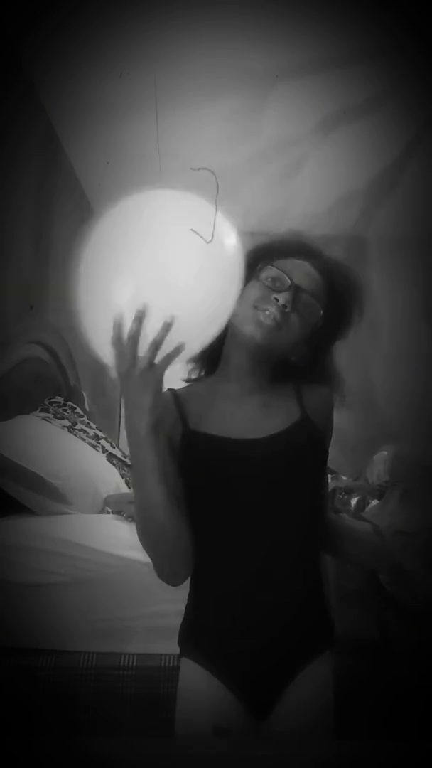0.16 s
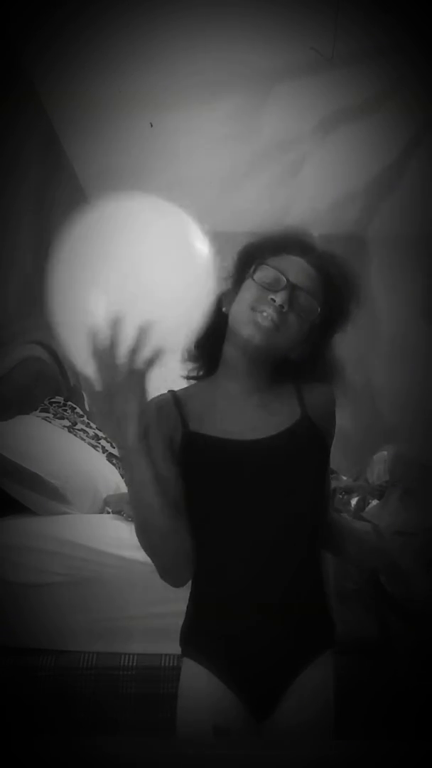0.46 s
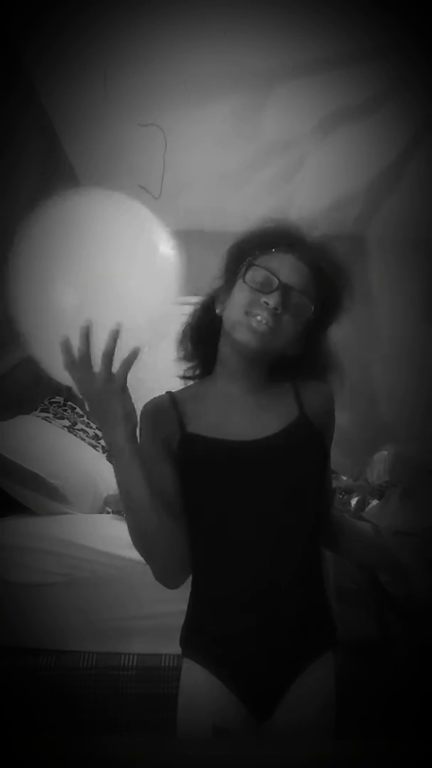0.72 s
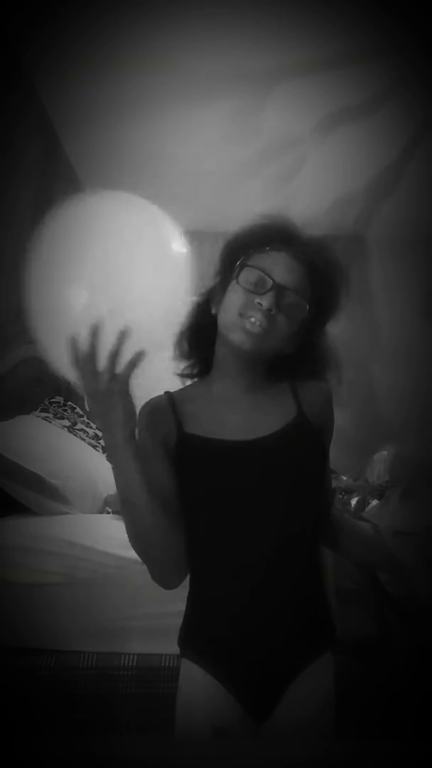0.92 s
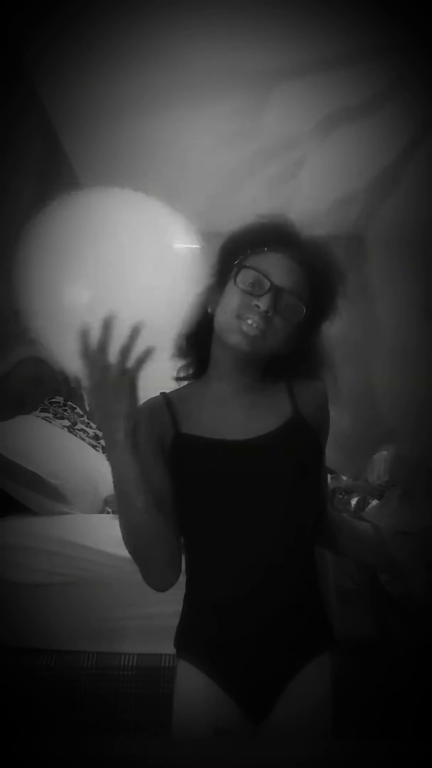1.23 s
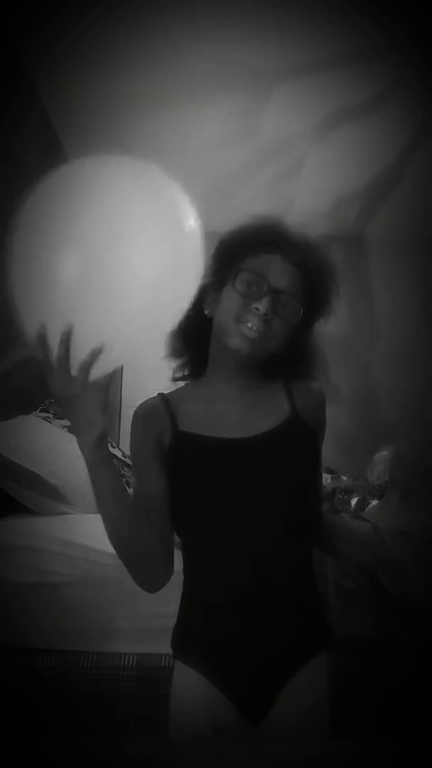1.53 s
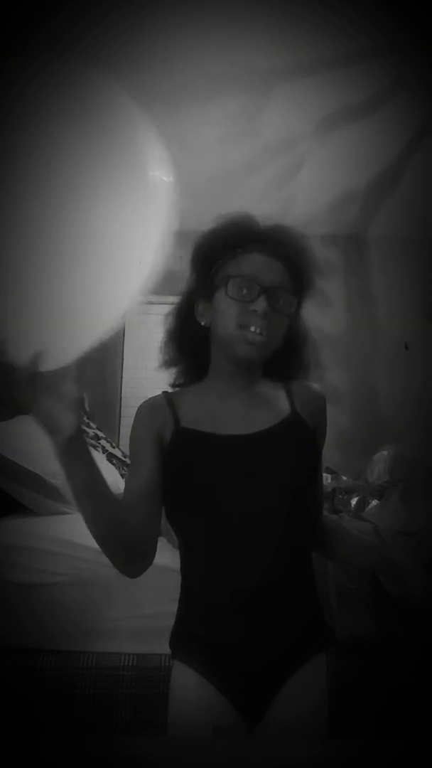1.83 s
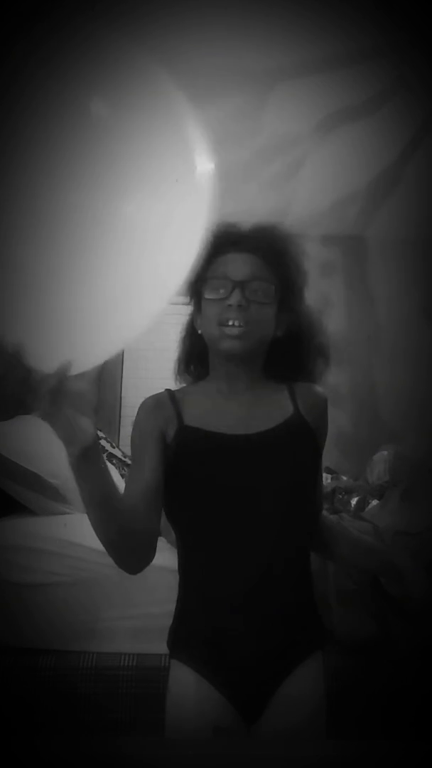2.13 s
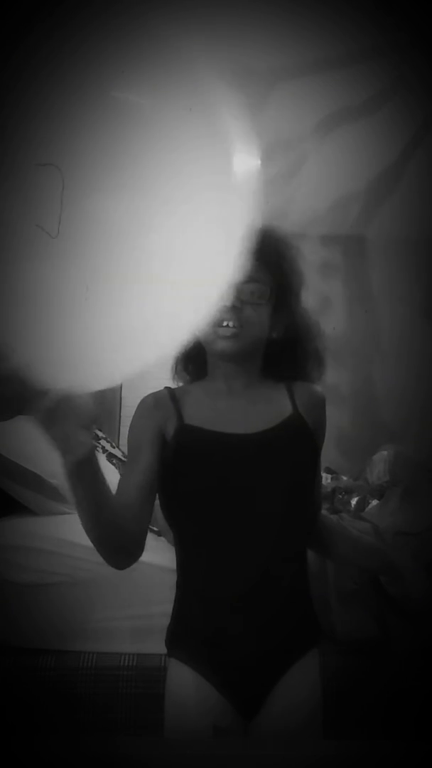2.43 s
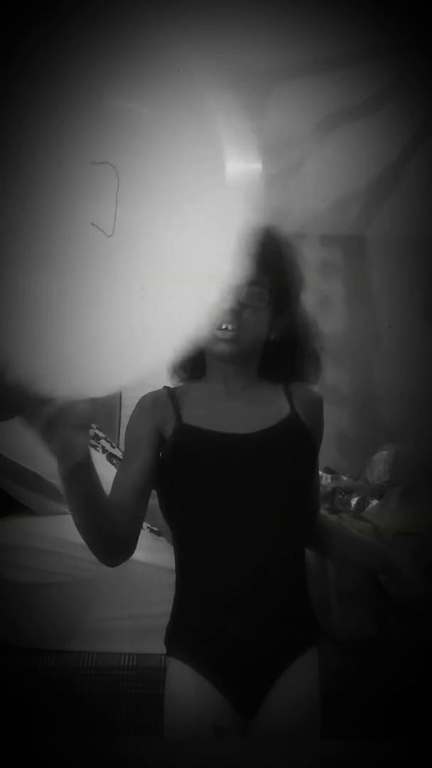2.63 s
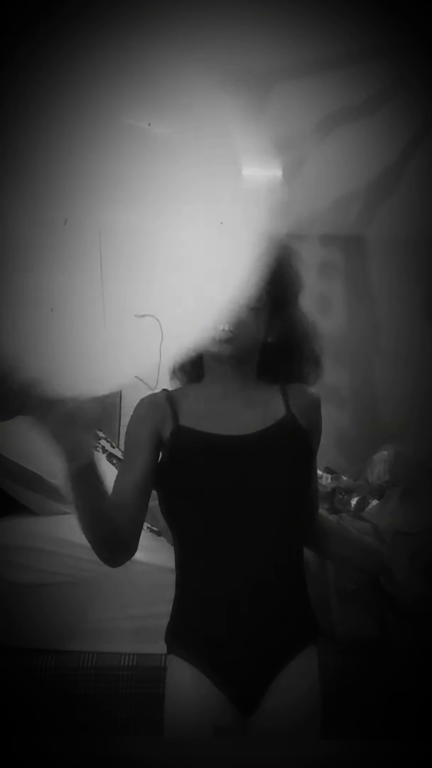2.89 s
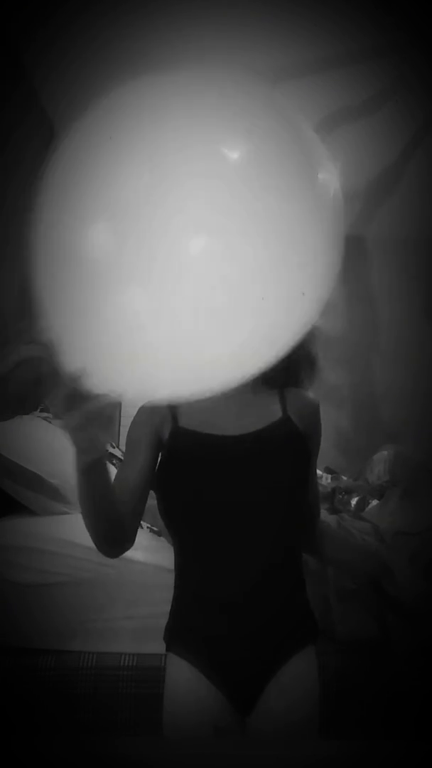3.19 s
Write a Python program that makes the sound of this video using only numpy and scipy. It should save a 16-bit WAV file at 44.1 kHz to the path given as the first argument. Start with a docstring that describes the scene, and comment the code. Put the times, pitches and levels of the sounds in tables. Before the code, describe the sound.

Hollow balloon knocks several times a second, soft at first, joined by crisp toy cracks and short pings; halfway it moves close to the microphone, with heavier thumps, rubber scuffs and one tiny squeak, in a quiet bedroom.

```python
"""Balloon with a rattling toy

An inflated latex balloon is jiggled and batted on the fingertips in a small room, a little toy inside.
Knocks sound the air as decaying sines and the skin as damped noise; shoves add a slow wobble.
Hard contacts crack, ring and ping the skin; rubbing is grainy noise with one thin rising squeak.
The room hums on at its low resonances, whose balance changes as the balloon comes closer halfway through.
"""
import sys
import numpy as np
from scipy.fft import rfft, irfft, next_fast_len
from scipy.io import wavfile
from scipy.ndimage import map_coordinates

SR = 44100
rng = np.random.default_rng(int(sys.argv[2]) if len(sys.argv) > 2 else 0)


def transcribe(signal):
    """Save signal, clipped to [-1, 1], as a 16-bit WAV file at the path in sys.argv[1]."""
    frames = np.atleast_2d(signal).T
    limited = np.clip(frames, -1, 1)
    pcm = np.round(limited * 32767).astype(np.int16)
    wavfile.write(sys.argv[1], SR, pcm)


N = 147735
T = np.arange(SR // 2) / SR  # time within one event [s]
CLOCK = np.arange(N) / SR  # time within the scene [s]
TILT_PIVOT_HZ = 2000  # spectral tilts leave this frequency unchanged


def amp(db):
    """Decibel law: level to amplitude ratio."""
    return 10 ** (np.asarray(db) / 20)


def unit(x):
    """Power normalization: scale to rms 1."""
    return x / np.sqrt(np.mean(x ** 2) + 1e-20)


def along(points, hz):
    """Logarithmic frequency scale: interpolate (frequency [Hz], value) points."""
    f, v = np.transpose(points)
    return np.interp(np.log(hz + 1), np.log(f + 1), v)


def fade(t60, rise):
    """Exponential damping: a quick rise, then a decay losing 60 dB in t60 seconds."""
    return 1000 ** (-T / t60) * (1 - np.exp(-T / rise))


def add(out, s, x):
    """Linear superposition: mix x into out at time s."""
    i = max(round(s * SR), 0)
    out[:, i:i + x.shape[-1]] += x[..., :max(N - i, 0)]


def shaped(x, envelope):
    """Energy conservation: noise under an envelope, with just the envelope's energy."""
    return unit(x * envelope) * np.sqrt(np.mean(envelope ** 2))


def wander(rate, t):
    """Band-limited randomness: a smooth random curve through `rate` points per second."""
    return map_coordinates(rng.standard_normal(200), [t * rate])


def nearness(s):
    """Source distance: 0 while the balloon is held back, 1 once it has come close."""
    closer_s, approach_s = 1.74, 0.34  # middle and duration of the approach
    return np.clip((s - closer_s) / approach_s + .5, 0, 1)


# left-right likeness of the room sound: (frequency [Hz], correlation [-1 to 1])
LIKENESS = [(60, 1), (130, 1), (300, 0.99), (600, 0.75), (1200, 0.24), (3000, 0.18), (12000, 0.036)]


def noise(spectrum, alike, size, colour_db=0):
    """Interaural coherence: coloured stereo noise of rms 1 with a set left-right correlation."""
    hz = np.fft.rfftfreq(size, 1 / SR)
    # cos^2 - sin^2 of this angle is the wanted correlation
    turn = np.arccos(np.clip(along(alike, hz), -1, 1)) / 2
    gain = amp(along(spectrum, hz) + colour_db)
    spread = gain * [np.cos(turn), np.sin(turn)]
    mid, side = irfft(rfft(rng.standard_normal((2, size))) * spread, size)
    return unit(np.array([mid + side, mid - side]))


# quiet room floor, spectrum shape: (frequency [Hz], relative level [dB])
FLOOR_SPECTRUM = [(25, 0), (50, -6), (120, 3), (300, -0.5), (1000, -17), (4000, -33), (16000, -42)]
FLOOR_DB = -48


def room_floor():
    """Stationary noise: the quiet, mostly low background of the room."""
    return amp(FLOOR_DB) * noise(FLOOR_SPECTRUM, LIKENESS, N)


def grain(rate, depth_db, size):
    """Stick-slip friction: a gain of rms 1 that jumps about at `rate` points per second."""
    at = np.arange(size) * rate / SR
    steps = map_coordinates(rng.standard_normal(size), [at], order=1)
    return unit(amp(depth_db * np.clip(steps, -2, 2)))


def bright_spot(hz, centre):
    """Resonant emphasis: the lift in dB round the frequency that a contact favours."""
    peak_db, peak_octaves = 7, 0.11
    return peak_db * np.exp(-.5 * (np.log2(hz / centre) / peak_octaves) ** 2)


# fixed set of skin modes: (frequency [Hz])
SKIN_MODES = [620, 915, 1110, 1840, 2750, 3550, 4220, 5050, 5550, 6720, 8800]
MODE_DB, MODE_SCATTER_DB = -1, 1  # mean change of colour at a mode; scatter from blow to blow
MODE_WIDTH = 0.012  # half-width as a share of the frequency
RIPPLE_DB, RIPPLE_SPACING_HZ = 3, 97.9  # random uneven colouring per contact
RIPPLE_FULL_HZ = 630  # the ripple reaches full depth here
DIRECT_ALIKE = 0.1  # least left-right correlation of the direct sound
TAIL_GRAIN_DB = 2.5


def contact_colour(tilt_db, bright_hz):
    """Spectral irregularity: random uneven colouring in dB per contact, plus a fixed set of skin modes."""
    hz = np.fft.rfftfreq(len(T), 1 / SR) + 1
    ripple = map_coordinates(rng.standard_normal(2000), [hz / RIPPLE_SPACING_HZ])
    colour_db = RIPPLE_DB * np.clip(ripple, -2, 1.5) * np.minimum(hz / RIPPLE_FULL_HZ, 1)
    colour_db += tilt_db * np.log2(hz / TILT_PIVOT_HZ)
    for mode_hz in SKIN_MODES:
        height_db = MODE_DB + MODE_SCATTER_DB * rng.standard_normal()
        colour_db += height_db / (1 + ((hz / mode_hz - 1) / MODE_WIDTH) ** 2)
    if bright_hz:
        colour_db += bright_spot(hz, bright_hz)
    return colour_db


def burst(spectrum, t60, rise, room_db, room_t60, room_rise, grain_db, tilt_db=0, bright_hz=None):
    """Direct and reverberant fields: a damped noise burst of the skin with the room's answer."""
    colour_db = contact_colour(tilt_db, bright_hz)
    close = [(f, max(v, DIRECT_ALIKE)) for f, v in LIKENESS]
    rough = noise(spectrum, close, len(T), colour_db) * grain(782, grain_db, len(T))
    direct = shaped(rough, fade(t60, rise))
    tail = noise(spectrum, LIKENESS, len(T), colour_db) * fade(room_t60, room_rise)
    return direct + amp(room_db) * tail * grain(450, TAIL_GRAIN_DB, len(T))


# knocks on the balloon: (time [s], pitch [Hz], relative thump level [dB],
# relative skin level [dB], relative room hum level [dB])
BALLOON_KNOCKS = [(0.0, 268, -41, -27.5, -36.5), (.196, 302, -24.5, -22.5, -31),
                  (.406, 343, -22, -23.5, -39.5), (0.534, 133, -29, -30.5, -37),
                  (.645, 334, -30.5, -24, -29.5), (0.731, 188, -26, -24.5, -36),
                  (.751, 238, -30, -23.5, -27.5), (.859, 257, -18.5, -17.5, -24.5),
                  (.955, 259, -18.5, -20, -21.5), (1.056, 245, -45, -17, -28.5),
                  (1.165, 245, -26.5, -29, -51), (1.192, 180, -17, -20, -21.5),
                  (1.295, 358.5, -25, -26.5, -34), (1.329, 245, -28, -26.5, -41),
                  (1.415, 248, -25, -27, -30), (1.572, 254, -27, -29, -30), (1.671, 153, -16.5, -19, -20.5),
                  (1.741, 239.5, -21.5, -24, -36), (1.765, 184, -18.5, -18.5, -23),
                  (1.849, 171, -17.5, -17, -15), (1.932, 214, -9.5, -18, -17.5),
                  (1.968, 208.5, -14.5, -18, -29), (2.004, 243, -16.5, -42, -23.5),
                  (2.045, 111, -32, -19, -14.5), (2.14, 181, -20, -16, -20.5),
                  (2.157, 245, -12, -23, -19.5), (2.259, 155, -21.5, -25, -16.5),
                  (2.314, 222.4, -11, -18, -28), (2.405, 335, -42, -25.5, -40),
                  (2.627, 172, -25, -27.5, -57), (2.708, 198, -16.5, -23, -24),
                  (2.881, 172.5, -21.5, -27, -28.5), (2.937, 231, -10, -24.5, -22.5),
                  (2.968, 214, -14, -27.5, -22), (3.03, 108, -23.5, -22.5, -13),
                  (3.151, 236, -17, -19.5, -16.5), (3.229, 190, -8, -17.5, -15.5),
                  (3.286, 158.6, -14, -23.5, -35), (3.331, 130, -19, -27.5, -37)]
# modes of the air and skin: (multiple of the pitch [1], relative level [dB], t60 [s])
AIR_MODES = [(0.622, -9.5, 0.19), (1, 1, 0.11), (1.421, -26, 0.048)]
# skin of a knock, spectrum shape: (frequency [Hz], relative level [dB])
SKIN_SPECTRUM = [(30, -38), (70, -0.5), (130, 3.5), (300, 4.5), (450, -2.5), (600, -7.5), (1000, -14),
                 (1600, -20.5), (4000, -28), (16000, -47)]
THUMP_RISE_S = 0.0045


def knocks():
    """Modal excitation: each knock rings the balloon's low modes and shakes its skin."""
    out = np.zeros((2, N))
    for s, hz, thump_db, skin_db, _ in BALLOON_KNOCKS:
        thump = 0
        for multiple, db, t60 in AIR_MODES:
            thump = thump + amp(db) * np.sin(2 * np.pi * hz * multiple * T) * fade(t60, THUMP_RISE_S)
        add(out, s, -amp(thump_db + 9.0) * thump)
        skin = burst(SKIN_SPECTRUM, t60=0.083, rise=0.0022, room_db=-4.5, room_t60=0.32,
                     room_rise=0.0035, grain_db=-3)
        add(out, s, amp(skin_db + 6) * skin)
    return out


# shoves that set the whole balloon wobbling: (time [s], level [dB])
BALLOON_SHOVES = [(0.0, -30.5), (.2, -29.5), (.41, -26.5), (.7, -27.5), (1.05, -24), (1.3, -33),
                  (1.67, -46), (2.26, -31), (3.23, -41)]
WOBBLE_HZ, WOBBLE_T60_S, WOBBLE_RISE_S = 50.8, 0.8, 0.0046


def wobble():
    """Damped free oscillation: the balloon's slowest mode swings on after each shove."""
    power = np.zeros((1, N))
    for s, db in BALLOON_SHOVES:
        add(power, s, (amp(db) * fade(WOBBLE_T60_S, WOBBLE_RISE_S)) ** 2)
    phase = 2 * np.pi * WOBBLE_HZ * CLOCK + .4 * wander(8, CLOCK)
    return np.sqrt(power) * np.sin(phase)


# room resonances: (frequency [Hz], t60 [s], relative level with the balloon far [dB],
# relative level with it near [dB])
ROOM_RESONANCES = [(108, 0.34, -9, 0), (127.7, 0.44, 0, -10.5), (169.6, 0.25, -4.5, -7.5),
                   (246.7, 0.5, -6.5, -8), (350, 0.57, -10.5, -28), (504.4, 0.16, -8.5, -19),
                   (573, 0.26, -13.5, -24)]
HUM_RISE_S = 0.0051


def room_hum():
    """Room modes: knocks feed low resonances, balanced by where the balloon is."""
    out = np.zeros(N)
    near = nearness(CLOCK)
    for hz, t60, far_db, near_db in ROOM_RESONANCES:
        power = np.zeros((1, N))
        for s, _, _, _, hum_db in BALLOON_KNOCKS:
            add(power, s, (amp(hum_db) * fade(t60, HUM_RISE_S)) ** 2)
        gain = amp(5.5 + far_db + near * (near_db - far_db))
        phase = 2 * np.pi * hz * CLOCK + .5 * wander(14, CLOCK)
        out += np.sqrt(power[0]) * gain * np.sin(phase)
    return out


# scuffs of the rubber: (middle [s], standard deviation of the swell [s], relative level [dB])
RUBBER_SCUFFS = [(.01, 0.064, -45.5), (0.065, 0.01, -39), (0.218, 0.064, -42.5), (0.437, 0.024, -33),
                 (0.544, 0.019, -39), (0.662, 0.027, -39.5), (1.401, 0.0087, -39.5), (2.032, 0.024, -23.5),
                 (3.245, 0.026, -28.5)]
# rubbing, spectrum shape: (frequency [Hz], relative level [dB])
SCUFF_SPECTRUM = [(100, -28), (400, 13.5), (900, 6.5), (1500, -2.5), (2600, 3), (4000, -9.5), (8000, -10),
                  (10500, -21.5), (15000, -19), (16500, -38)]


def scuffs():
    """Friction noise: grainy swells of rubbing."""
    swell = sum(amp(db) * np.exp(-.5 * ((CLOCK - s) / length) ** 2) for s, length, db in RUBBER_SCUFFS)
    return swell * noise(SCUFF_SPECTRUM, LIKENESS, N) * grain(rate=430, depth_db=3.0, size=N)


# crack of a contact, spectrum shape: (frequency [Hz], relative level [dB])
CLICK_SPECTRUM = [(150, -26), (500, -6), (1000, 6), (1500, -3), (2000, 3), (4000, -1), (6000, -3),
                  (8700, -7), (10300, -20), (12500, -15.5), (15000, -25), (16500, -64)]
CLICK_T60_S, CLICK_RISE_S = 0.019, 0.00036  # for a contact at CLICK_DB
CLICK_DB, LONGER_PER_DB = -15.5, 0.1473  # harder contacts last longer, by this exponent per dB
RING_T60_S, RING_DETUNE = .17, .008  # random spread of each ring's pitch, as a share of it


def skin_ring(centre, tilt_db):
    """Modal superposition: the skin's modes sing on, in a new mix for each contact."""
    hz = np.array(SKIN_MODES) * (1 + RING_DETUNE * rng.standard_normal())
    level_db = along(CLICK_SPECTRUM, hz) + tilt_db * np.log2(hz / TILT_PIVOT_HZ)
    level_db += 2 * bright_spot(hz, centre) + MODE_SCATTER_DB * rng.standard_normal(len(hz))
    gain = amp(level_db) * np.sqrt(hz)
    waves = np.sin(2 * np.pi * (hz[:, None] * T + rng.random((2, len(hz), 1))))
    return gain / np.linalg.norm(gain) @ waves * fade(RING_T60_S, CLICK_RISE_S)


# the toy strikes the taut rubber: (time [s], relative level [dB], brightest frequency [Hz],
# tilt [dB per octave])
TOY_CLICKS = [(.406, -21, 400, -7), (0.6298, -28, 1980, -6), (0.7325, -15.5, 1860, 1),
              (.735, -14, 5300, -1.5), (0.8575, -22, 2570, -3.5), (0.863, -23.5, 4000, 6),
              (.868, -17.5, 3000, 0), (0.9545, -17, 3800, -1.5), (0.96, -25, 6500, -6.5),
              (1.0525, -19.5, 3900, -6), (1.059, -13.5, 4100, 0), (1.196, -21.5, 3640, 3),
              (1.301, -25, 2830, 2), (1.329, -22, 3940, -4), (1.4962, -25, 3120, -4.5),
              (1.6698, -28, 1500, 3), (1.6772, -25.5, 1030, 1), (1.7428, -28.5, 4470, 4),
              (1.766, -16.5, 1620, -2.5), (1.849, -18, 2350, -3.5), (1.932, -17, 1110, -3.5),
              (1.938, -18, 2270, 6), (1.9663, -13.5, 1060, -0.5), (2.0036, -16.5, 3000, 2),
              (2.007, -15, 3200, 0), (2.015, -29, 3200, 1), (2.044, -16, 1550, -3), (2.141, -21, 645, -4),
              (2.156, -16.5, 1110, -4.5), (2.2603, -25, 2450, 5), (2.314, -18, 960, 0),
              (2.32, -19, 1330, 2), (2.4069, -29, 1010, -3), (2.4916, -28.5, 2480, -2.5),
              (2.627, -27, 1170, -11), (2.638, -18, 1140, -4.5), (2.7076, -17.5, 1080, -5),
              (2.8904, -20.5, 2700, 3.2), (2.9363, -16.5, 2780, 3.5), (2.9721, -17, 950, -5.5),
              (3.028, -17, 1620, -5), (3.038, -15, 2780, -1), (3.153, -13.5, 1620, 5),
              (3.153, -14, 3730, 5.5), (3.2311, -17, 3000, 0.5), (3.236, -12, 1080, -7.5),
              (3.2861, -15.5, 2330, -3)]
SNAP_DB, SNAP_T60_S = -3.5, 0.0034  # the first instant of a contact
RING_DB, NEAR_DRIER_DB, PAN_SCATTER_DB = -14, 3, 4.5


def clicks():
    """Impact excitation: the toy cracks on taut rubber; longer contacts feed ring and room more."""
    out = np.zeros((2, N))
    octaves = np.log2((np.fft.rfftfreq(len(T), 1 / SR) + 1) / TILT_PIVOT_HZ)
    for s, db, hz, tilt_db in TOY_CLICKS:
        longer = np.exp(LONGER_PER_DB * (db - CLICK_DB))
        fed_db = 10 * np.log10(longer) - NEAR_DRIER_DB * nearness(s)
        crack = burst(CLICK_SPECTRUM, t60=CLICK_T60_S * longer, rise=CLICK_RISE_S * longer,
                      room_db=fed_db - 10, room_t60=0.25, room_rise=0.001,
                      grain_db=-2.0, tilt_db=tilt_db, bright_hz=hz)
        # the snap is tilted 2 dB per octave further toward the treble
        snap = noise(CLICK_SPECTRUM, LIKENESS, len(T), (tilt_db + 2) * octaves)
        snap = shaped(snap, 1000 ** (-T / SNAP_T60_S))
        ring = skin_ring(hz, tilt_db)
        contact = crack + amp(SNAP_DB) * snap + amp(RING_DB + fed_db) * ring
        pan = amp(PAN_SCATTER_DB * rng.standard_normal() * np.array([[.5], [-.5]]))
        add(out, s, amp(db) * contact * pan)
    return out


# short hollow pings of the skin, many sounding together with a click:
# (time [s], settled pitch [Hz], level [dB])
SKIN_PINGS = [(.637, 480, -24), (.733, 1855, -17.5), (1.06, 4070, -16), (1.967, 1042, -15.5),
              (2.002, 2950, -19), (2.636, 1122, -22), (3.155, 4000, -12.5), (3.234, 608, -18),
              (3.236, 1090, -15.5), (3.287, 2180, -22)]
PING_CYCLES, PING_RISE_S = 38, .0015  # t60 in cycles of the settled pitch; attack
PING_SAG = .1  # share by which the pitch starts high


def pings():
    """Damped oscillation: a short hollow ping of the skin, its pitch sagging at the start."""
    out = np.zeros((2, N))
    for s, hz, db in SKIN_PINGS:
        swing = fade(PING_CYCLES / hz, PING_RISE_S)
        pitch = hz * (1 + PING_SAG * np.exp(-T / PING_RISE_S / 2))
        note = np.sin(2 * np.pi * np.cumsum(pitch) / SR)
        add(out, s, amp(db) * swing / swing.max() * note)
    return out


SQUEAK_S, SQUEAK_LENGTH_S, SQUEAK_DB = 3.137, .018, -42  # middle; standard deviation of the swell; level
SQUEAK_HZ, SQUEAK_HZ_PER_S = 3120, 3500  # pitch at the middle; its rise


def squeak():
    """Frequency modulation: one thin rising tone, its phase roughened by stick-slip grain."""
    t = CLOCK - SQUEAK_S
    phase = 2 * np.pi * (SQUEAK_HZ * t + SQUEAK_HZ_PER_S * t * t / 2)
    phase += grain(rate=300, depth_db=4, size=N)
    return amp(SQUEAK_DB) * np.exp(-.5 * (t / SQUEAK_LENGTH_S) ** 2) * np.sin(phase)


def scene():
    """Superposition: the balloon, the room's hum and its quiet floor."""
    balloon = knocks() + wobble() + scuffs() + clicks() + pings() + squeak()
    return balloon + room_hum() + room_floor()


# unlike colour of the two microphone ports: (frequency [Hz], left minus right [dB])
PORT_COLOUR = [(60, 2.6), (250, -0.7), (1000, -0.6), (2200, 2), (3500, 1), (5000, -2.5), (7000, -1.5),
               (8000, 7), (9300, 18), (11000, 7.5), (15500, 6)]
LEFT_LEAD_S, LOW_CUT_HZ, TOP_HZ = .00008, 24, 16200


def record(dry):
    """Spaced-pair stereophony: two unlike ports, the left slightly nearer; a steep upper band limit."""
    size = next_fast_len(N + SR // 2)
    hz = np.fft.rfftfreq(size, 1 / SR)
    sides = np.array([[.5], [-.5]])
    colour = amp(sides * along(PORT_COLOUR, hz))
    colour = colour / np.sqrt(np.mean(colour ** 2, axis=0))  # keep the mean power of both ports
    low_cut = hz ** 4 / (hz ** 4 + LOW_CUT_HZ ** 4)
    lead = np.exp(2j * np.pi * hz * sides * LEFT_LEAD_S)
    return irfft(rfft(dry, size) * colour * low_cut * lead * (hz < TOP_HZ), size)[:, :N]


dry = scene()
out = record(dry)
transcribe(out)
```